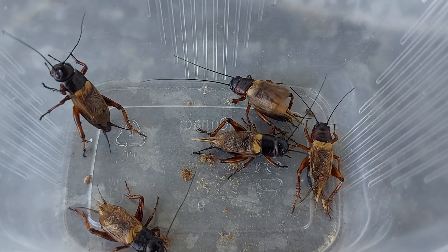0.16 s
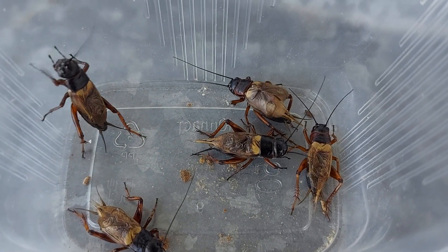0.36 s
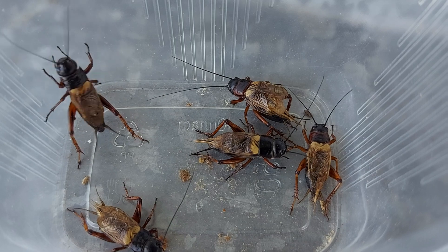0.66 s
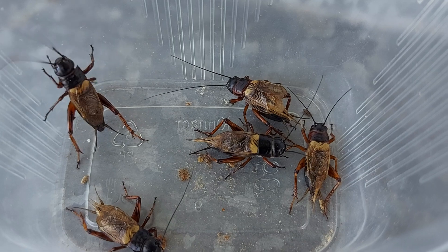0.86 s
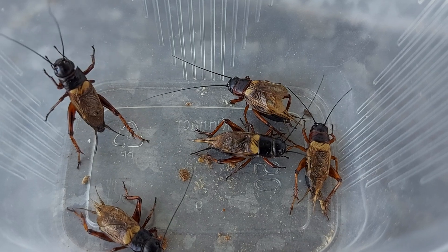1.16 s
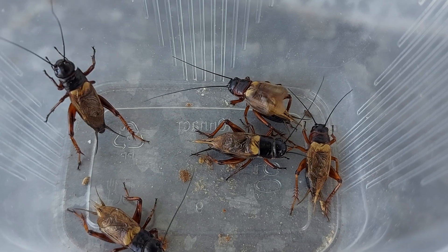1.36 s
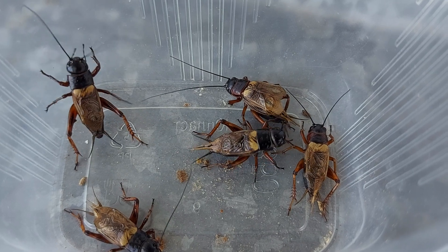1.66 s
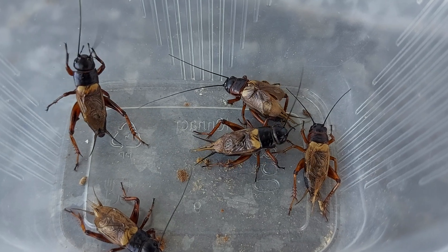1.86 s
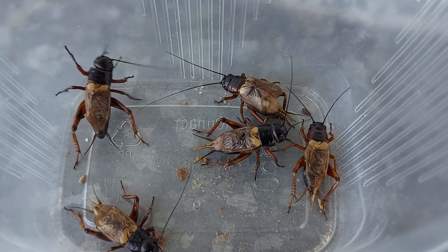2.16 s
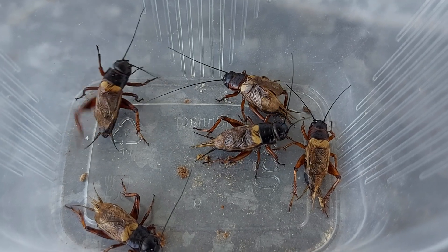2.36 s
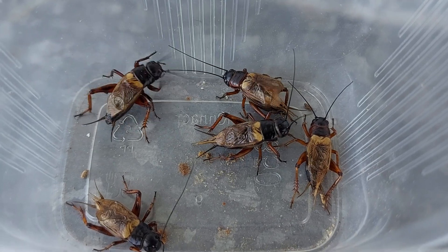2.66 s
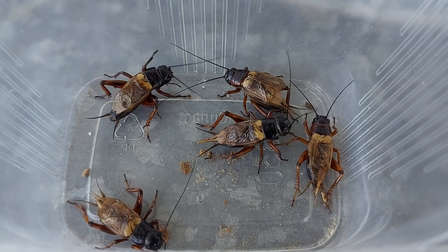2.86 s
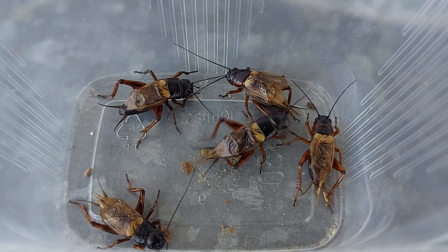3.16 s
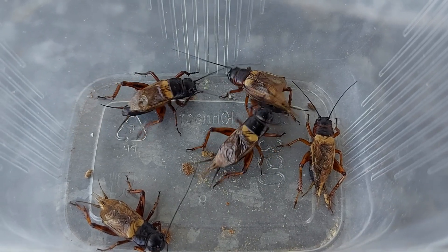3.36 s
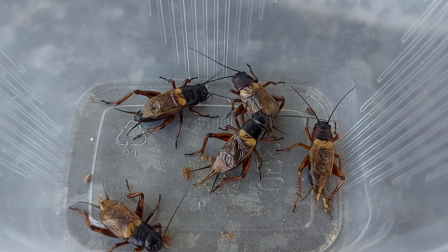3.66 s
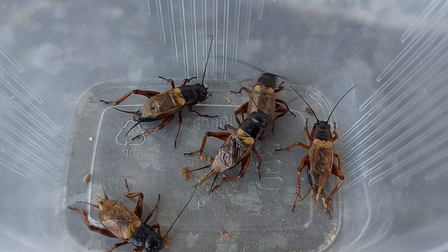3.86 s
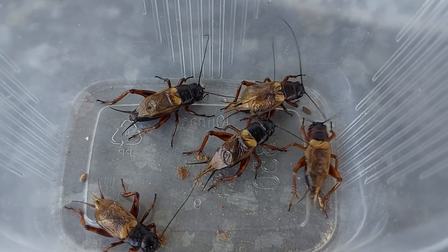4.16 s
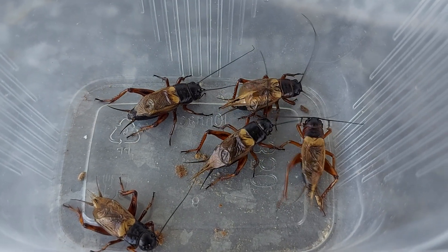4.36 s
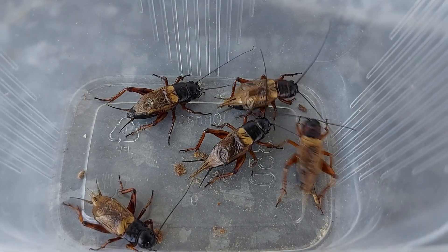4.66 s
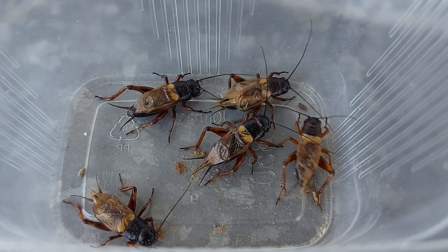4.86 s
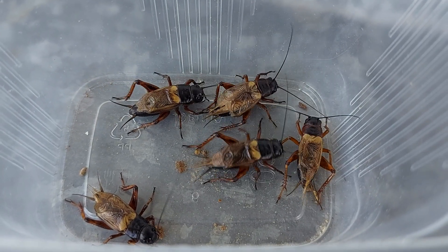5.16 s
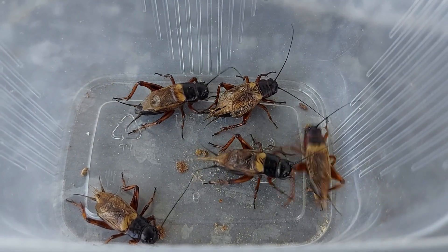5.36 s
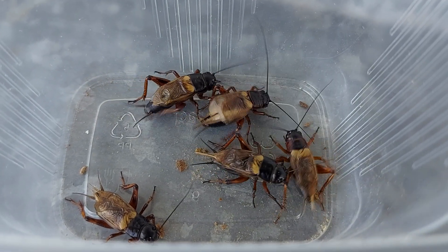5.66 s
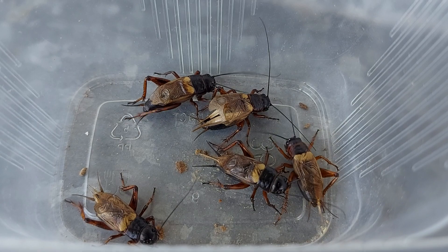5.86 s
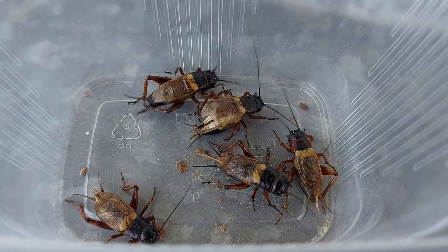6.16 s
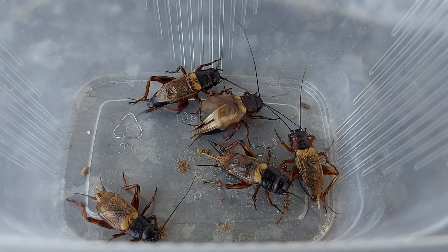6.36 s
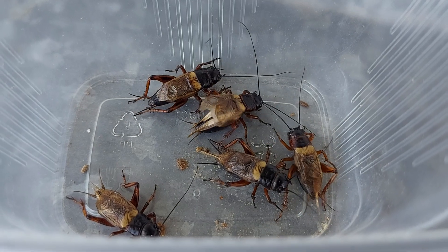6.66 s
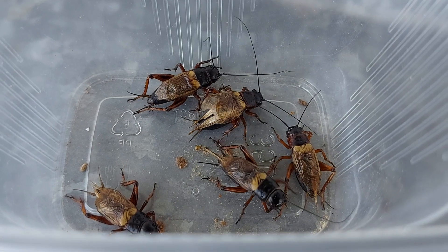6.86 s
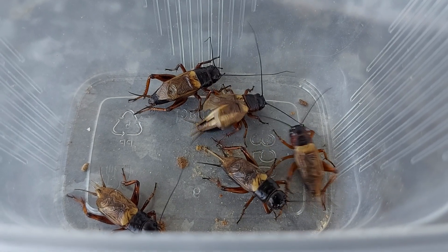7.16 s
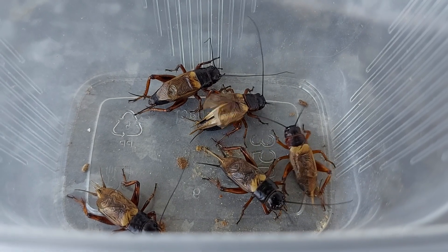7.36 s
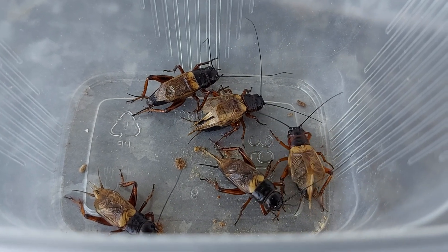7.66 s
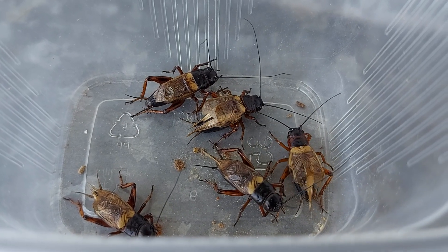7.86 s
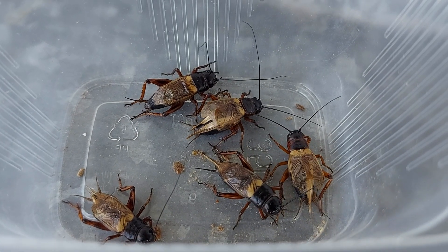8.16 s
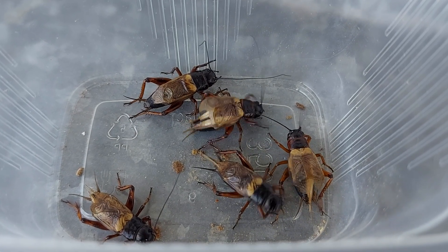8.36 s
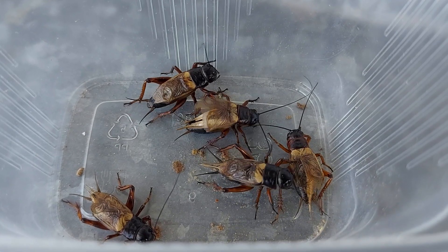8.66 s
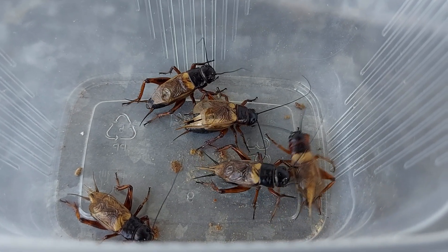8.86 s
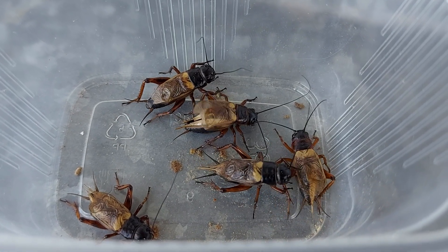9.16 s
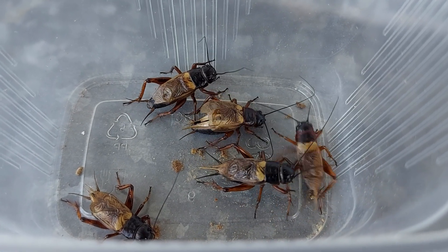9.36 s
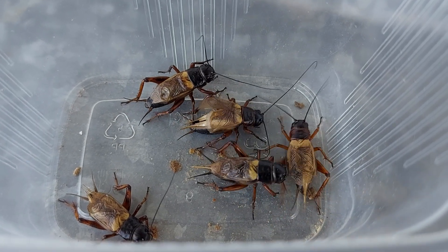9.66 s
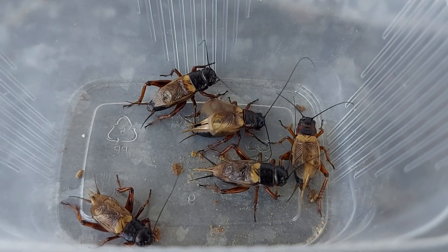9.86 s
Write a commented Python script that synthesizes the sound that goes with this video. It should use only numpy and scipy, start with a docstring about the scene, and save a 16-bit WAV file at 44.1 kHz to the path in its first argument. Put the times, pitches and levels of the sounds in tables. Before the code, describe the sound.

Crickets chirp close by, first in single high strokes and soft ticks, then in nearly continuous quick chirps, over a faint room hum.

```python
"""Field crickets in an open plastic tub in a small room, close under a two-port microphone.
Over room rumble, hum and faint hiss, the song opens with single loud wing strokes, each a falling tone.
From about 2 s soft courtship strokes tick and scrape; they carry on while the song rests after 3.2 s.
At 5.5 s the song returns in chirps of several strokes, flat at first, and runs to the end.
All along wings rustle, claws scuff, legs now and then bump the tub, and the room answers briefly."""
import sys
import numpy as np
from scipy import signal
from scipy.fft import rfft, irfft, next_fast_len
from scipy.io import wavfile
from scipy.ndimage import uniform_filter1d, map_coordinates

SR = 44100
rng = np.random.default_rng(int(sys.argv[2]) if len(sys.argv) > 2 else 0)


def materialize(psi):
    """Save the field psi as 16-bit PCM at rate SR to the path in sys.argv[1].

    A 1-D psi becomes a single channel; in a 2-D psi each row is a channel.
    """
    bounded = np.clip(np.atleast_2d(psi).T, -1, 1)
    quanta = np.round(bounded * 32767).astype(np.int16)
    wavfile.write(sys.argv[1], SR, quanta)


N = 441000
TIME = np.arange(N) / SR


def amp(db):
    """dB to gain."""
    return 10 ** (np.asarray(db) / 20)


def unit(x):
    """Scaled to rms 1."""
    return x / np.sqrt(np.mean(x ** 2) + 1e-20)


def along(points, hz):
    """Interpolate (f/Hz, value) points on a log axis."""
    f, v = np.transpose(points)
    return np.interp(np.log(hz + 1), np.log(f + 1), v)


def wobble(rate):
    """A smooth random curve, rate knots a second."""
    return map_coordinates(rng.standard_normal(int(N * rate / SR) + 4), [TIME * rate])


def filtered(x, response):
    """x through a response of frequency."""
    m = next_fast_len(N + SR // 2)
    return irfft(rfft(x, m) * response(np.fft.rfftfreq(m, 1 / SR)), m)[..., :N]


def noise(spectrum):
    """Coloured noise of rms 1."""
    return unit(filtered(rng.standard_normal(N), lambda hz: amp(along(spectrum, hz))))


def resonances(modes):
    """The response of (f/Hz, width/Hz, level/dB) modes of alternating sign."""
    return lambda f: sum((-1) ** k * amp(db) * 1j * f * width / (hz * hz - f * f + 1j * f * width)
                         for k, (hz, width, db) in enumerate(modes))


def add(track, s, sound):
    """Lay a sound on a track at s seconds."""
    part = track[..., max(round(s * SR), 0):][..., :sound.shape[-1]]
    part += sound[..., :part.shape[-1]]


def hump(u, power, lean):
    """A swell over 0-1: a small power flattens its top, a lean over 1 makes it peak late."""
    return np.sin(np.pi * np.clip(u, 0, 1) ** lean) ** power


# Spectrum of the room tone: f/Hz, relative level/dB
AIR_SPECTRUM = [(15, -40), (25, -11), (76, -4.5), (161, -10), (206, -7), (242, -11.5), (301, -3.5),
                (326, -14), (451, -11), (489, -20.5), (1840, -28), (2610, -37.5), (3080, -40.5),
                (16000, -36)]
# Room tone at the microphone: t/s, rumble level/dB, hiss level/dB
AIR_LEVELS = [(0, -52.5, -71.5), (1, -54.5, -68), (2, -59, -75), (3, -57, -77), (4, -55.5, -69),
              (4.7, -52.5, -69), (5.7, -53, -63), (6.5, -57.5, -69), (8, -54.5, -65), (9, -58, -68),
              (10, -56, -67.5)]
# Likeness of the room tone at the two ports: f/Hz, correlation
PORT_LIKENESS = [(60, 0.91), (300, 0.86), (500, 0.528), (800, -0.54), (2500, 0.24)]
def room_tone():
    """Patchy rumble and hiss of the room around the microphone."""
    white = signal.stft(rng.standard_normal((2, N)), nperseg=512)[2]
    patches = uniform_filter1d(uniform_filter1d(rng.standard_normal(white.shape[1:]), 6, 0), 12, 1)
    pair = signal.istft(white * amp(.98 * unit(patches)), nperseg=512)[1][:, :N]

    def mid_side(hz):
        angle = np.arccos(np.clip(along(PORT_LIKENESS, hz), -1, 1)) / 2
        return amp(along(AIR_SPECTRUM, hz)) * [np.cos(angle), np.sin(angle)]

    mid, side = filtered(pair, mid_side)
    air = np.array([amp(.6) * (mid + side), amp(-.6) * (mid - side)])
    rumble = filtered(air, lambda hz: hz < 700)
    s, rumble_db, hiss_db = np.transpose(AIR_LEVELS)
    hiss = amp(np.interp(TIME, s, hiss_db)) * unit(air - rumble)
    return amp(np.interp(TIME, s, rumble_db)) * unit(rumble) + hiss


# Hum in the room: f/Hz, mean level/dB
HUM_TONES = [(37.7, -97.5), (80.7, -81), (301.5, -61), (393.0, -70.5)]
def hum():
    """Low tones waver in level and phase, alike at both ports."""
    return sum(amp(db + 3 * wobble(8)) * np.sin(2 * np.pi * hz * TIME + .9 * wobble(7))
               for hz, db in HUM_TONES)


# Decay of the small room: f/Hz, t60/s
ROOM_DECAY = [(3000, 0.055), (5200, 0.18), (10000, 0.14), (15000, 0.071)]
def room_echoes(source):
    """Echoes build after the first walls and die by band; the scatter changes as the animals move."""
    echoes, step = np.zeros((2, N)), SR // 4
    fade = np.hanning(2 * step)
    for k in range(-step, N, step):
        hz, t, white = signal.stft(rng.standard_normal((2, SR // 2)), SR, nperseg=256)
        tail = signal.istft(white * amp(-60 * t / along(ROOM_DECAY, hz)[:, None]), SR, nperseg=256)[1]
        tail *= 1 - np.exp(-(np.arange(tail.shape[1]) / SR / .007) ** 2)
        part = source[max(k, 0):k + 2 * step]
        part = part * fade[max(-k, 0):][:len(part)]
        add(echoes, k / SR, signal.fftconvolve(part[None], tail / np.linalg.norm(tail[0]), axes=1))
    return echoes


# Restless animals in the tub: t/s, claw level at the right port/dB, relative wing level/dB
FIDGETS = [(0, -80, -48.5), (.7, -72.5, -62), (1.6, -82.5, -69), (1.899, -92, -60.5), (2.8, -77.5, -63),
           (3.25, -80, -62.5), (3.55, -100, -61), (4, -77.5, -57), (4.4, -74, -49), (5.15, -85, -51),
           (5.349, -92, -69), (5.6, -77.5, -51.5), (6.9, -79, -58.5), (7.2, -69.5, -57), (7.55, -91, -52.5),
           (8.699, -73, -51.5), (9.45, -83, -57.5), (10, -74, -49)]
def wing_rustle():
    """Restless wings scrape in fits, with a dull rasp."""
    s, _, wing_db = np.transpose(FIDGETS)
    fits = amp(np.interp(TIME, s, wing_db)) * unit(amp(6.5 * wobble(130) + 2 * wobble(15)))
    tilt_hz, tilt_db = [4600, 5300, 5930, 9000, 12500], [20.5, -3.5, -5.5, 8.5, -.5]
    return fits * filtered(rasp(spike_db=3), lambda hz: amp(np.interp(hz, tilt_hz, tilt_db)))


# Legs on the tub: t/s, relative level/dB, rattle offset/dB
LEG_BUMPS = [(0.299, -68, -6), (0.797, -41, -15.5), (1.157, -41.5, -8.5), (1.727, -49.5, -4),
             (3.151, -40.5, -7.5), (3.371, -59, -10), (4.419, -46, -6.5), (4.498, -65, -21),
             (4.917, -32.5, -5), (5.166, -46, -4), (5.547, -35, -7.5), (7.312, -46, -4), (7.977, -34.5, -8),
             (8.607, -35.5, -9), (8.845, -51, -0.5), (9.316, -45.5, -1.5)]
# Modes of the tub's floor: f/Hz, width/Hz, relative level/dB
FLOOR_MODES = [(225, 26.5, 6), (266.7, 42, 1), (426, 91, -4.5), (602, 150, -21.5)]
# Modes of the tub's wall: f/Hz, width/Hz, relative level/dB
WALL_MODES = [(1090, 170, -1), (1480, 130, 3.5), (1830, 440, -3), (2510, 220, -3), (3310, 110, -2.5)]
# Spectrum of the tub's rattle: f/Hz, relative level/dB
RATTLE_SPECTRUM = [(700, -32.5), (1000, -13), (1400, 8), (2500, -9), (3600, 10), (6000, 8.5), (15000, -6)]
def legs_on_tub():
    """A scramble of legs shakes the floor: a thud in its modes and a rattle; claws scuff the wall."""
    thud, rattle, t = np.zeros(N), np.zeros(N), np.arange(SR // 4) / SR
    for s, db, rattle_db in LEG_BUMPS:
        add(thud, s, amp(db - 3.5 - 60 * t / .29) * (1 - np.exp(-t / .002)))
        add(rattle, s, amp(db + rattle_db + 6.5 - 60 * t / .2) * (1 - np.exp(-t / .0054)))
    push, floor = rng.standard_normal(N), resonances(FLOOR_MODES)
    thuds = filtered(thud * push, floor) / np.std(filtered(push, floor))
    lumps = amp(1.17 * wobble(180))
    s, claw_db, _ = np.transpose(FIDGETS)
    claws = amp(np.interp(TIME, s, claw_db)) * unit(amp(1.8 * wobble(25) + 7.9 * wobble(120)))
    wall = unit(filtered(rng.standard_normal(N), resonances(WALL_MODES)))
    late_wall = np.roll(wall, 15)  # reaches the right port later
    scuff = claws * np.array([amp(7) * wall, late_wall])
    clatter = np.array([noise(RATTLE_SPECTRUM) + .65 * wall, noise(RATTLE_SPECTRUM) + .66 * late_wall])
    return thuds + rattle * lumps * clatter / 1.78 + scuff


# Spectrum of the wing's file scraping, close up: f/Hz, relative level/dB
RASP_SPECTRUM = [(2500, -36), (3800, -26), (5200, 1.5), (6600, 2.5), (8500, -13.5), (10500, -11),
                 (13000, 3), (14200, -9.5), (15600, 3)]
def rasp(spike_db):
    """Teeth struck out of rhythm: spiky noise, partly shared by both ports."""
    left = noise(RASP_SPECTRUM)
    spikes = amp(spike_db * np.clip(wobble(700), -2, 2))
    right = .5 * np.roll(left, 15) + .85 * noise(RASP_SPECTRUM)
    return unit(spikes * np.array([left, right]))


# Bright courtship ticks: t/s, length/ms, tone level/dB, relative scrape level/dB
BRIGHT_TICKS = [(1.861, 7.2, -36, -26.5), (2.013, 5, -36, -16), (2.163, 3.9, -36.5, -27),
                (2.325, 8.9, -39.5, -21), (2.491, 5.9, -36.5, -20), (2.656, 2.7, -37, -36),
                (2.819, 6.8, -32.5, -19), (3.629, 7, -57, -20.5), (3.79, 8.6, -42, -22),
                (4.055, 4, -31.5, -24), (4.234, 8.5, -40, -28), (4.439, 1.6, -21.5, -15),
                (4.613, 5, -14.5, -12), (4.781, 4.6, -15, -16), (4.978, 8.3, -30, -17),
                (5.141, 9, -37, -18), (5.517, 11, -30.5, -45), (9.977, 2.3, -24.5, -23)]
# Husky pings between the ticks: t/s, length/ms, tone level/dB, f/Hz
HUSKY_PINGS = [(1.814, 9.6, -35, 4700), (2.071, 2.9, -31, 4600), (2.227, 3.7, -34, 4630),
               (2.746, 6.9, -39, 4630), (2.788, 12.5, -32, 5500), (4.199, 6.3, -32.5, 5280),
               (4.31, 8.5, -37, 5000), (4.506, 9, -33, 4470), (4.706, 7.3, -34, 4780),
               (4.744, 8.5, -35, 5400), (4.901, 2.6, -37, 4540), (5.047, 7.6, -35, 4950)]
# Before a single loud stroke: time ahead/s, length/ms, tone level/dB, f/Hz, relative scrape level/dB
LEAD_INS = [(.056, 8, -41, 4780, -37.5), (.035, 18, -27, 5250, -34.5)]
# Spells of faint blips: from t/s, to t/s, count
BLIP_SPELLS = [(1.88, 2.9, 30), (3.72, 3.8, 1), (4.08, 5.25, 30)]
TICK_HZ, FAINT_SCRAPE_DB = 5243, -59.5
BLIP_MS, BLIP_HZ, BLIP_DB = (2.26, 7.2), (4390, 5460), (-49, -48.5)  # ranges
def soft_strokes():
    """Ticks, pings, lead-ins and random blips as rows: t/s, length/ms, tone/dB, f/Hz, scrape/dB."""
    rows = [(s, ms, db, TICK_HZ, scrape_db) for s, ms, db, scrape_db in BRIGHT_TICKS]
    rows += [(*ping, FAINT_SCRAPE_DB) for ping in HUSKY_PINGS]
    rows += [(s - ahead, *rest) for s, *_ in LOUD_STROKES
             for ahead, *rest in LEAD_INS if ahead < s < SOLO_UNTIL_S]
    for start, end, count in BLIP_SPELLS:
        for _ in range(count):
            s, ms, hz, db = (rng.uniform(*span) for span in [(start, end), BLIP_MS, BLIP_HZ, BLIP_DB])
            rows.append((s, ms, db, hz, FAINT_SCRAPE_DB + db - max(BLIP_DB)))
    return rows


# Spectrum of a wing hardly ringing: f/Hz, relative level/dB
HUSK_SPECTRUM = [(3200, -52), (4200, -8), (5200, 4), (6500, -9), (7500, -19)]
def courtship():
    """Short light strokes barely start the wing: each gives a husky blip and a bright tick."""
    tone, scrape, husk = np.zeros(N), np.zeros(N), noise(HUSK_SPECTRUM)
    sway, swell = .8 * wobble(900), amp(3 * wobble(500))
    for s, ms, db, hz, scrape_db in soft_strokes():
        t = np.arange(round((ms / 1000 + .0048) * SR)) / SR
        here = slice(round(s * SR), round(s * SR) + len(t))
        clear = np.interp(ms, [4, 9], [.85, .5])  # the longer the stroke, the huskier
        wave = clear * np.sin(2 * np.pi * hz * t + sway[here]) + (1 - clear) * husk[here]
        add(tone, s - .0015, amp(db) * hump(t / t[-1], 1.4, .65) * swell[here] * wave)
        add(scrape, s - .0015, amp(scrape_db) * hump(t / t[-1], 1.3, .38))
    tilt_hz, tilt_db = [6530, 10500, 12150, 13900, 14850], [-19, -1, -.5, 5.5, -1]
    bright = filtered(rasp(spike_db=5.5), lambda hz: amp(np.interp(hz, tilt_hz, tilt_db)))
    return np.array([tone, amp(-2.5) * np.roll(tone, -2)]) + scrape * bright


# The song runs flat as the chirping sets in, in all but the chirps' opening strokes: t/s, pitch offset/Hz
FLAT_START = [(5.55, -170), (5.8, -82), (6.3, -0.5)]
SOLO_UNTIL_S, CHIRP_GAP_S = 3.3, .075  # single strokes until then; a longer gap opens a new chirp
SOLO, OPENING, FOLLOWING = (5185, 8.7), (5110, 8.6), (5300, 14)  # start f/Hz, sag/(Hz per ms)
def glides():
    """Start and end pitch of every loud stroke, from its place in the chirp and its length."""
    s, ms = np.transpose(LOUD_STROKES)[:2]
    opens = np.diff(s, prepend=-1) > CHIRP_GAP_S
    kinds = [SOLO if at < SOLO_UNTIL_S else OPENING if first else FOLLOWING for at, first in zip(s, opens)]
    hz, sag = np.transpose(kinds)
    hz = hz + np.interp(s, *np.transpose(FLAT_START)) * ~opens + 25 * rng.standard_normal(len(s))
    return zip(hz, hz - sag * ms)


# Phase offset of the crickets' tone between left and right: t/s, offset/us
TONE_OFFSET = [(0, 56), (3.3, 43), (6.1, 39), (7.95, 53.5), (8.1, 32), (10, 55)]
# The song, close up: t/s, length/ms, relative tone level/dB, slip place/0-1 (0: none), scrape level/dB
LOUD_STROKES = [(.02, 11, -14, 0, -25.5), (.222, 10.5, -21.5, 0, -24.5), (0.427, 14.4, -17.5, 0, -29.5),
                (.627, 11.8, -13, 0, -20.5), (.825, 3.1, -17, 0, -14.5), (1.006, 12.4, -11.5, 0, -28),
                (1.186, 11, -11.5, 0, -24), (1.407, 13.1, -13, 0, -30.5), (1.656, 13.5, -15.5, 0, -31.5),
                (2.986, 8.4, -20, 0, -23.5), (3.179, 11, -12.5, 0, -33.5), (5.555, 7.5, -20.5, 0, -22.5),
                (5.584, 12.3, -17, 0, -27), (5.615, 18.2, -13.5, 0, -24.5), (5.664, 13.6, -13, 0, -24),
                (5.7, 16.2, -13, 0, -30.5), (5.755, 18.8, -13, 0, -25), (5.79, 15.3, -11.5, 0, -26),
                (5.997, 9.9, -18.5, 0, -41.5), (6.029, 14.7, -15.5, 0, -35.5),
                (6.06, 18.4, -11.5, 0.3, -21), (6.093, 19, -11.5, .36, -23), (6.129, 15.3, -12.5, 0, -28.5),
                (6.255, 14.7, -13.5, 0.5, -23.5), (6.291, 16, -13, .19, -20), (6.32, 21, -11.5, 0.5, -26),
                (6.356, 19.3, -13, 0, -28.5), (6.388, 20, -16, .57, -13.5), (6.429, 21, -13, 0.4, -25),
                (6.468, 19.6, -11.5, 0.3, -22), (6.562, 18.4, -19, 0, -23.5), (6.595, 22.6, -13, .35, -24),
                (6.628, 12.5, -13.5, 0.83, -15), (6.667, 7.2, -18.5, 0, -20), (6.783, 9.3, -20, 0, -24),
                (6.813, 21, -13.5, .24, -22.5), (6.847, 22, -13, .36, -23), (7.029, 9.1, -19, 0, -30),
                (7.056, 22.7, -14, 0.28, -28), (7.091, 23, -13, 0.35, -25), (7.135, 16, -18.5, 0, -24),
                (7.224, 12, -16, 0.38, -26.5), (7.255, 19.7, -12.5, .38, -27), (7.39, 16, -18, 0, -25.5),
                (7.423, 14.3, -14, 0.6, -19), (7.623, 6.1, -25, 0, -27), (7.649, 22.2, -14, .25, -21),
                (7.681, 20, -11.5, .52, -23.5), (7.78, 5.4, -18.5, 0, -17), (7.822, 23.4, -13, 0.29, -18.5),
                (7.849, 27, -10, 0.67, -21), (7.964, 9.6, -22, 0, -37.5), (7.991, 16, -20, 0, -31),
                (8.023, 10.7, -16, 0, -30.5), (8.106, 11.8, -16, 0, -24), (8.137, 21, -13.5, .3, -19.5),
                (8.175, 19, -12.5, .38, -21.5), (8.288, 11, -17, 0, -22.5), (8.319, 23, -13.5, 0.3, -23),
                (8.351, 24.7, -15.5, .38, -21), (8.398, 18.6, -16.5, 0, -29.5), (8.484, 4.4, -19, 0, -22.5),
                (8.511, 17, -13.5, 0.32, -26), (8.548, 17.8, -14, 0, -35), (8.739, 3, -22, 0, -25),
                (8.761, 20, -13.5, 0.3, -22), (8.793, 20.9, -12.5, 0.4, -20.5), (8.949, 9.7, -17.5, 0, -29),
                (8.978, 19.4, -13, .3, -22), (9.009, 15, -18, 0.8, -20), (9.121, 13, -16.5, 0, -23.5),
                (9.151, 22, -12, 0.3, -18), (9.189, 15.5, -13, .64, -15.5), (9.284, 11.8, -18, 0, -25),
                (9.317, 18.8, -14, 0.33, -18), (9.351, 11.6, -15.5, 1, -14), (9.555, 11, -31, 0, -35.5),
                (9.583, 12.4, -12, 0.4, -19), (9.623, 13.5, -11, 0, -20.5), (9.651, 12, -12, 0.46, -20),
                (9.729, 13.6, -12.5, .46, -19.5), (9.758, 19.8, -29, .75, -20),
                (9.835, 13.6, -12.5, 0.4, -21), (9.866, 20.3, -22, 0.9, -20.5),
                (9.903, 13.7, -17.5, 0.54, -18)]
UNBROKEN, SLIPPED = (1.1, 1.38), (.85, 1.21)  # swell of a stroke: power, lean
BEFORE_SLIP_DB, LATE_DOUBLING_DB = -2, -3.5  # weaker ring before a slip; less doubling in long chirps
def song():
    """The scraper runs down the file and slows: the wing's tone falls; a slip breaks it with a click."""
    tone, scrape, reopen = np.zeros((2, N)), np.zeros(N), np.zeros(N)
    sway, swell = .22 * wobble(600), amp(1.1 * wobble(400))  # uneven teeth
    for (s, ms, db, slip, scrape_db), (start_hz, end_hz) in zip(LOUD_STROKES, glides()):
        offset = np.interp(s, *np.transpose(TONE_OFFSET)) / 1e6
        length, start = ms / 1000, s - .004
        t = np.arange(round((length + .007) * SR)) / SR + np.array([[-offset], [0]])
        progress = t / (length + .0068)
        here = slice(round(start * SR), round(start * SR) + t.shape[1])
        rough = 1 + .25 * max(-17 - db, 0)  # weak strokes catch the teeth unevenly
        hz = start_hz + (end_hz - start_hz) * np.clip((t - .004) / length, 0, 1) ** 2.2  # sags late
        phase = 2 * np.pi * (np.cumsum(hz, axis=1) / SR + start_hz * t[:, :1]) + rough * sway[here]
        envelope = hump(progress, *(SLIPPED if slip else UNBROKEN)) * swell[here]
        grit = hump(progress[1], 1.1, .95)
        if slip:
            since_slip = t - .004 - slip * length
            phase += 1.4 * np.tanh(since_slip / .0004)  # the wing restarts out of step
            envelope *= amp(BEFORE_SLIP_DB * (.5 - .5 * np.tanh(since_slip / .00085)))
            envelope *= 1 - .98 * np.exp(-(since_slip / .0012) ** 2)
            grit = .7 * grit + .9 * np.exp(-(since_slip[1] / .002) ** 2)
        wave = amp(db + 6) * np.sin(phase)
        wave += amp(.61 * db - 12.5) * hump(progress, .94, 1.54) * np.sin(2 * phase)
        wave += amp(1.1 * db - 21) * np.sin(3 * phase)
        if not slip:  # an unbroken stroke briefly doubles its period
            doubling = amp(db - 17) * np.sin(1.5 * phase) + amp(db - 6) * np.sin(2.5 * phase)
            wave += amp(LATE_DOUBLING_DB * (s > SOLO_UNTIL_S)) * hump(progress, 7.6, .72) * doubling
        add(tone, start, envelope * wave)
        add(scrape, start, amp(scrape_db) * grit)
        drag = hump(np.arange(600) / 600, .4, .53)  # the wings drag open again
        add(reopen, s + length, amp(db - 29.5) * drag)
    teeth = rasp(spike_db=6.5)
    husk = np.array([noise(HUSK_SPECTRUM), noise(HUSK_SPECTRUM)])
    return tone + scrape * teeth + reopen * husk


# Shade on the crickets at the right port: f/Hz, gain/dB
PORT_SHADE = [(5000, 0.5), (6600, -1), (8500, -6.5), (10500, -23.5), (13000, -14.5), (15500, -5.5)]
def scene():
    """Crickets close up, their echoes, the tub and the room; the right port is shaded from the treble."""
    near = song() + courtship() + wing_rustle()
    left, right = near + amp(-14) * room_echoes(near[0])
    right = filtered(right, lambda hz: amp(along(PORT_SHADE, hz)))
    return np.array([left, right]) + legs_on_tub() + room_tone() + hum()


BAND_LIMIT_HZ = 15800
def record(dry):
    """The recorder keeps little above its band limit."""
    offset_hz, gain_db = [-80, 80, 700, 1400], [0, -20, -32, -90]
    return filtered(dry, lambda hz: amp(np.interp(hz - BAND_LIMIT_HZ, offset_hz, gain_db)))


dry = scene()
out = record(dry)
materialize(out)
```